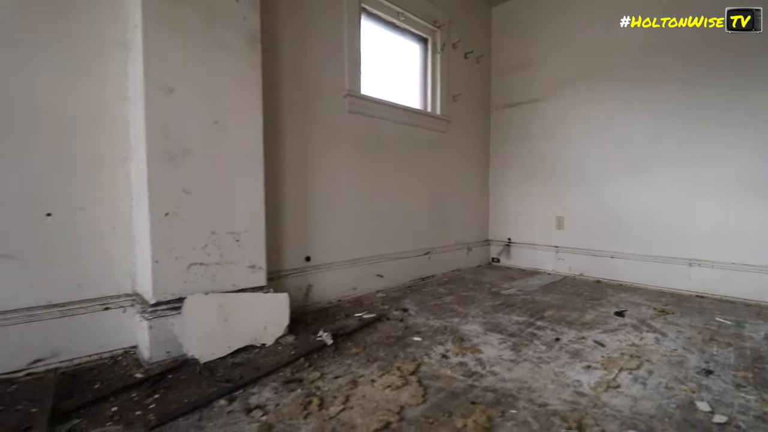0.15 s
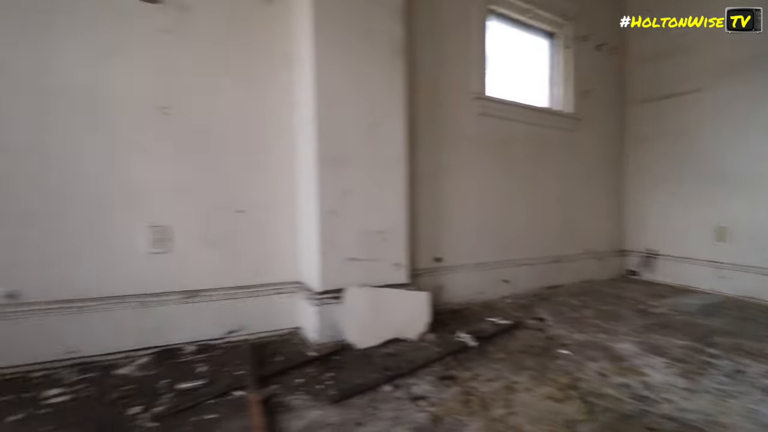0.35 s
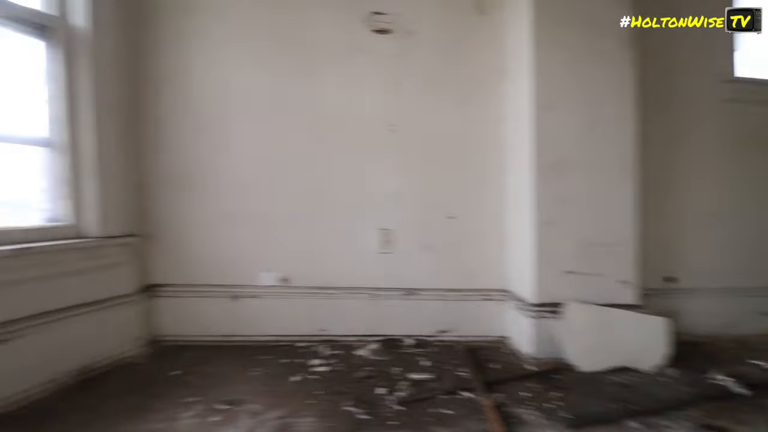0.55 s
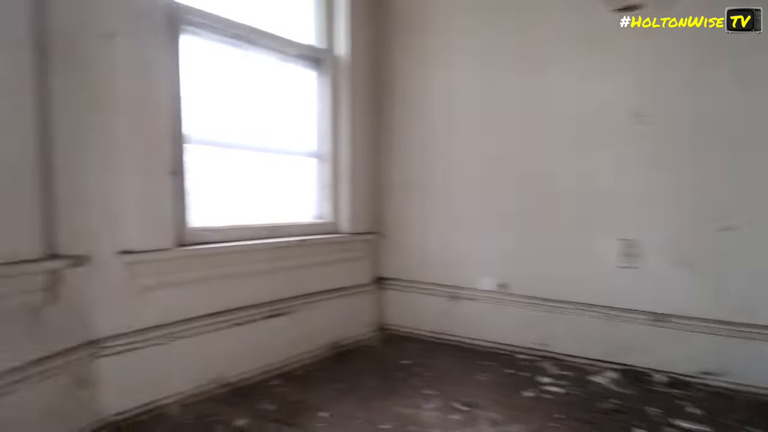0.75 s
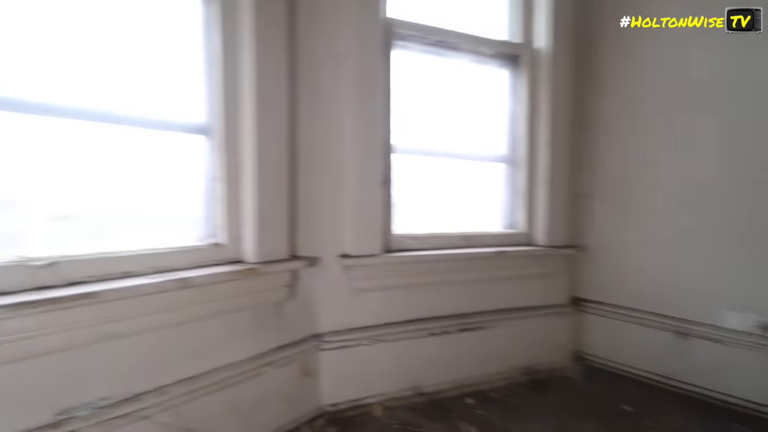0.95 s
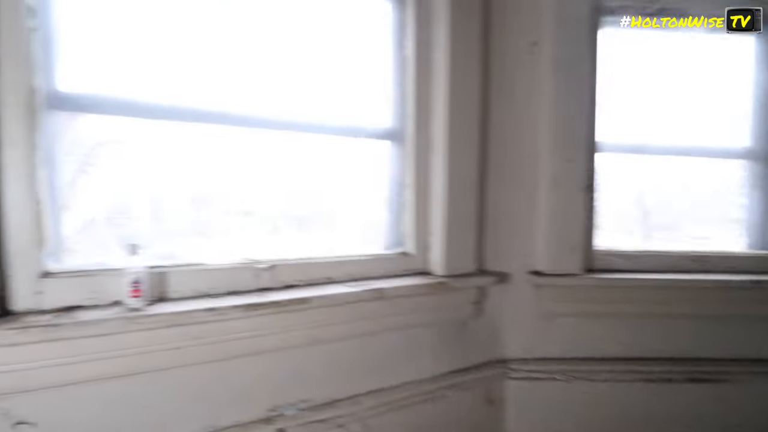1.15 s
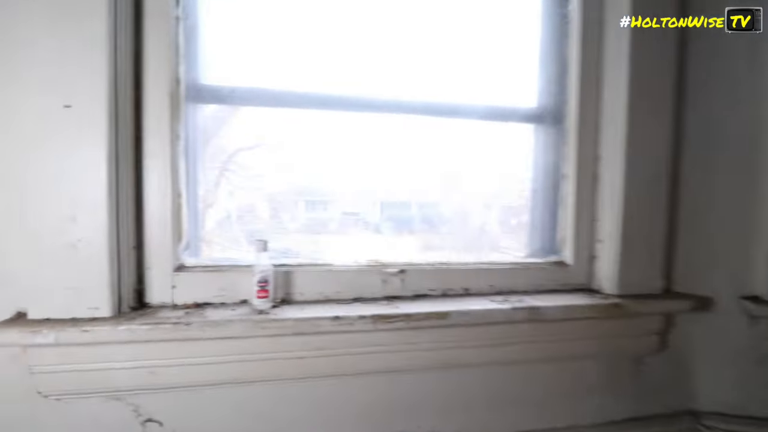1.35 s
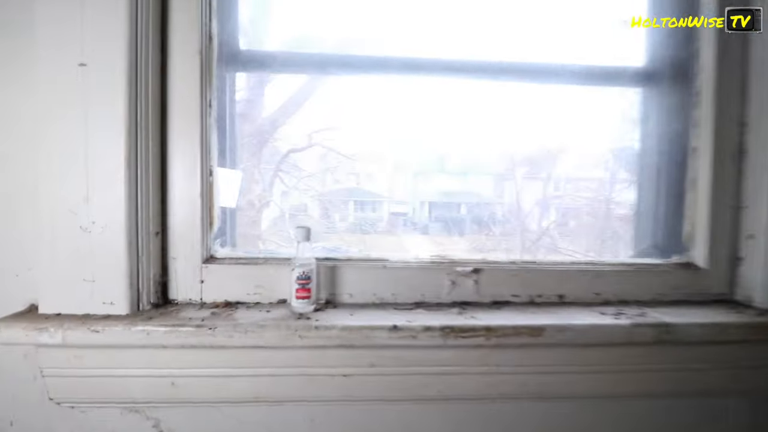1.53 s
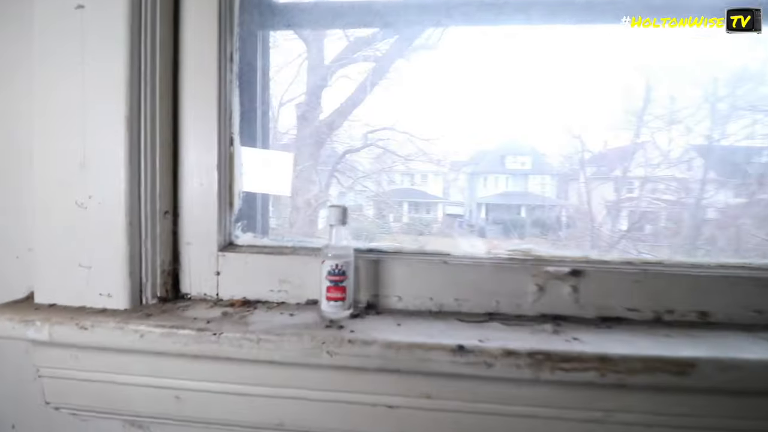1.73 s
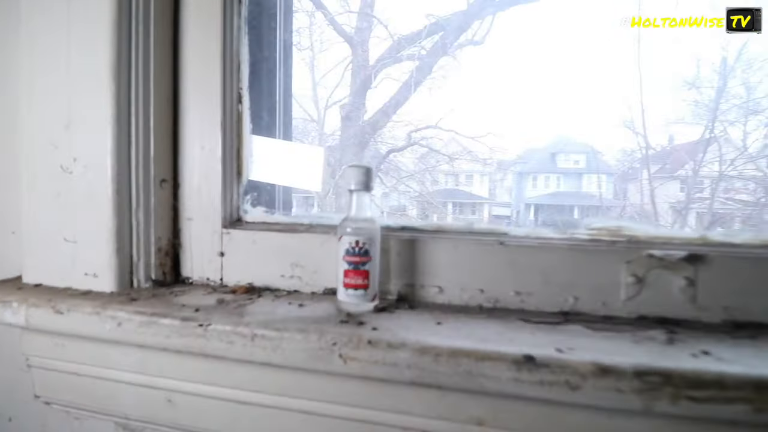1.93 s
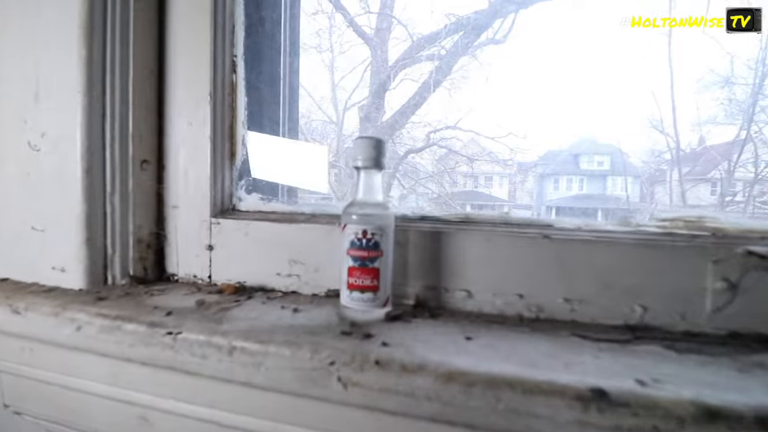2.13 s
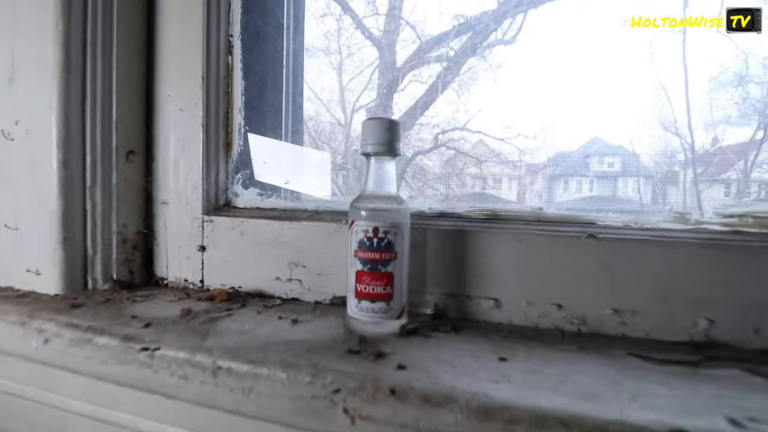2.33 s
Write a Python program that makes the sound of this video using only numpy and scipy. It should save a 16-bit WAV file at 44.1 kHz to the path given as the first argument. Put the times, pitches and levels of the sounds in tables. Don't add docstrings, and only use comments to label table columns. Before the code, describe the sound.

Three heavy, gritty footsteps on bare wooden boards echo through an empty, gutted house

```python
import sys
import numpy as np
from scipy import signal
from scipy.fft import rfft, irfft
from scipy.io import wavfile

SR = 44100
rng = np.random.default_rng(int(sys.argv[2]) if len(sys.argv) > 2 else 0)


def invert_db(level):
    return 10 ** (np.asarray(level, dtype=float) / 20)


def transcribe(u):
    v = np.clip(np.atleast_2d(u).T, -1, 1)
    q = np.round(v * 32767).astype(np.int16)
    wavfile.write(sys.argv[1], SR, q)


N = 109632
T = np.arange(N) / SR

# frequency in Hz, density in dB per Hz.
HUSH_SPECTRUM = [(15, -15.5), (25, -9), (128, -11.5), (167, -11.5), (326, -10), (488, -22), (709, -22),
                 (8550, -29.5), (15000, -33)]
# time in seconds, level in dB.
HUSH_FADE = [(0, 3), (.7, 0), (1.4, 0.5), (2.1, 0), (2.49, -6.5)]
HUSH_DB = -50.5

# start in seconds, rise in seconds, hold in seconds, level in dB, grain pitch in Hz.
SCUFFS = [(0.001, 0.0067, 0.064, -46.5, 650), (0.023, 0.015, 0.14, -48, 6900),
          (0.065, 0.022, .11, -44, 1150), (0.065, 0.013, 0.14, -46, 280), (0.231, 0.0075, 0.032, -39, 1900),
          (0.247, 0.028, 0.052, -45.5, 296), (0.969, 0.04, 0.16, -51, 483), (0.046, 0.03, 0.084, -46, 3240),
          (0.561, 0.019, 0.23, -55.5, 786), (.814, 0.009, 0.05, -44, 9400),
          (0.81, 0.0065, 0.01, -39.5, 3960), (0.818, 0.0067, 0.1, -42, 845),
          (0.993, 0.017, 0.046, -43.5, 10500), (0.998, 0.018, 0.041, -50, 3060),
          (1.571, 0.0062, .03, -45, 8900), (1.567, 0.0021, 0.01, -42, 2200),
          (1.575, 0.002, 0.063, -40.5, 650), (1.673, 0.016, 0.062, -50.5, 7400),
          (1.7, 0.023, 0.14, -46.5, 720), (1.886, 0.027, 0.075, -46, 7600),
          (1.898, 0.034, 0.036, -41.5, 3530), (1.914, 0.033, 0.039, -34.5, 820),
          (2.04, 0.009, 0.0099, -54, 8500), (2.039, 0.0067, 0.034, -43.5, 1490)]
SCUFF_RELEASE_S, GRAIN_OCTAVES = 0.033, 0.64
GRAINS_PER_S, GRAIN_SCATTER_DB = 6000, 1.8

# frequency in Hz, time to fall 60 dB in seconds.
ROOM_T60 = [(60, 0.46), (250, 0.92), (1000, 1), (3000, 0.61), (8000, 0.25), (15000, 0.1)]
# frequency in Hz, gain in dB.
ROOM_COLOUR = [(40, -15), (160, -9.5), (300, -1), (600, 0.5), (8000, 1), (15000, -1.5)]
ROOM_DB, ROOM_BUILD_S = -6.5, 0.014

# frequency in Hz, level in dB, time to fall 60 dB in seconds.
MODES_A = [(99.8, -14.5, 0.55), (136.7, -23, .12), (169.7, 0.5, 0.15), (205, -3, 0.24), (256.8, -4.5, 0.27),
           (335.2, -5.5, 0.27), (385, -11, 0.16), (517, -6, 0.064), (720, -18, 0.083)]
MODES_B = [(66.4, -4, 0.31), (101, -25, 0.18), (146, -10, 0.14), (205, -10, 0.075), (279, 0, 0.056),
           (355, 1.5, 0.08), (466.5, -3, 0.11), (587, -2.5, 0.071), (671, -1.5, 0.13), (850, -16, 0.036),
           (1010, -1, 0.032), (1234, -9.5, 0.11), (1524, 6.5, 0.018), (1900, -2, .02)]
MODES_C = [(69.5, -29, 0.25), (98.54, 5, 0.82), (116, -4.5, 0.3), (232, -11, 0.2), (283.5, -6.5, 0.47),
           (484, -1.5, 0.054), (695, 1.5, 0.2), (750, 5, 0.036), (867, -1, 0.022), (1140, -38, 0.053),
           (1453, 11, 0.065), (1670, 8, 0.093), (1690, -12, 0.054), (2200, 10.5, 0.09)]
# start in seconds, level in dB, contact in milliseconds.
BLOWS_A = [
    (0.097, -42.5, 2.8),
    (0.641, -48.5, 1.8),
    (0.7919, -23.5, 3.56),
    (0.844, -29, 2.57),
    (.862, -36, 3),
    (1.019, -40.5, 2.1),
    (1.181, -45, 1.3),
]
BLOWS_B = [
    (1.536, -31.5, 1.15),
    (1.5386, -25, .8),
    (1.545, -28.5, 3.8),
    (1.563, -26.5, 4.2),
    (1.5747, -26.5, 0.65),
    (1.5839, -23.5, 1.73),
    (1.671, -35.5, 1.25),
    (1.819, -34.5, 2.1),
]
BLOWS_C = [
    (.255, -47.5, 0.13),
    (1.86, -40.5, 3.1),
    (1.926, -40, 3.1),
    (1.95, -33.5, 1.26),
    (1.957, -29.5, 1.37),
    (1.962, -23.5, 4.3),
    (1.99, -37.5, 0.63),
    (2.04, -43, 0.79),
]
SLAP_DB, SPOT_DB, BOARD_LOW_HZ = 2.5, 1.5, 67

# start in seconds, level in dB, length in seconds.
JOLTS = [
    (0.112, -49.5, 0.065),
    (0.184, -48.5, 0.18),
    (.525, -48, 0.044),
    (0.805, -43, 0.14),
    (1.066, -49, .08),
    (1.547, -43, 0.11),
    (1.8, -65, 0.12),
]
# lower edge in Hz, upper edge in Hz.
JOLT_BAND_HZ = [22, 44]

# start in seconds, peak in dB, pitch in Hz.
FLAKES = [(.2533, -36, 2500), (.8185, -33, 7000), (.824, -33, 5500), (.835, -33, 3600),
          (1.5733, -29, 10500), (1.5736, -28, 3500), (1.5742, -20, 1500), (1.5813, -22, 9000),
          (1.5815, -22, 12500), (1.5933, -28, 9000), (1.6012, -21, 11000), (2.066, -35, 9000)]
FLAKE_T60_S, FLAKE_HISS = 0.004, 0.9

# frequency in Hz, side relative to mid in dB.
WIDTH = [(25, -13), (90, -16.5), (250, -13), (500, -9.5), (1000, -4), (2000, 0.4), (15000, -1)]
# frequency in Hz, gain in dB.
LEAN = [(100, -37), (500, -13), (2000, -11), (4000, -5), (8000, -22), (12000, -9)]
BODY_SCATTER_S = 0.002
# frequency in Hz, gain in dB.
MIC = [(20, 4.5), (3500, 2.5), (4900, -4), (6500, 1.5), (13000, -2), (15000, -7), (16500, -25)]


def unit(x):
    return x / np.sqrt(np.mean(x ** 2))


def read(table, hz):
    table = np.array(table, float)
    return np.interp(np.log(np.maximum(hz, 1)), np.log(table[:, 0]), table[:, 1])


def colour(x, table):
    size = 8192
    gain = invert_db(read(table, np.fft.rfftfreq(size, 1 / SR)))
    cepstrum = irfft(np.log(gain))
    cepstrum[1:size // 2] *= 2
    cepstrum[size // 2 + 1:] = 0
    response = irfft(np.exp(rfft(cepstrum)))
    return signal.fftconvolve(x, response)[:len(x)]


def house_hush():
    fade = invert_db(HUSH_DB + np.interp(T, *np.array(HUSH_FADE).T))
    return fade * unit(colour(rng.standard_normal(N), HUSH_SPECTRUM))


def sole_scuffs():
    out, t = np.zeros(N + SR), T[:SR // 2]
    for start, rise, hold, db, hz in SCUFFS:
        struck = rng.random(len(t)) < GRAINS_PER_S / SR
        size = invert_db(GRAIN_SCATTER_DB * rng.exponential(size=len(t)))
        impulses = struck * rng.standard_normal(len(t)) * size
        edges = hz * 2 ** np.array([-GRAIN_OCTAVES, GRAIN_OCTAVES])
        grains = signal.lfilter(*signal.butter(1, edges, "band", fs=SR), impulses)
        release = np.exp(-np.maximum(t - rise - hold, 0) / SCUFF_RELEASE_S)
        shape = np.clip(t / rise, 0, 1) * release
        i = int(start * SR)
        out[i:i + len(t)] += invert_db(db) * shape * unit(grains)
    return out[:N]


def wall_echo():
    t, spectrum = T[:SR], rfft(rng.standard_normal(SR))
    hz, out = np.maximum(np.arange(len(spectrum)), 1), 0
    for centre in 20 * 2 ** np.arange(0, 10, 0.5):
        octaves = np.clip(np.log2(hz / centre), -0.5, 0.5)
        band = irfft(spectrum * np.cos(np.pi * octaves) ** 2)
        out = out + band * invert_db(-60 * t / read(ROOM_T60, centre))
    out = out * (1 - np.exp(-t / ROOM_BUILD_S))
    return out / np.sqrt(np.sum(out ** 2))


def board(modes, blows):
    out, t = np.zeros(N), T[:SR // 2]
    for start, db, contact_ms in blows:
        push = np.hanning(max(contact_ms * SR / 1000, 4) * 1.4) ** 2
        ring = np.zeros(len(t))
        for hz, mode_db, t60 in modes:
            spot_db = SPOT_DB * rng.standard_normal()
            ring += invert_db(mode_db + spot_db - 60 * t / t60) * np.sin(2 * np.pi * hz * t)
        hit = signal.fftconvolve(ring, -push / push.sum())
        slap = np.diff(push, 2, prepend=0, append=0)
        hit[:len(slap)] += invert_db(SLAP_DB) * slap / np.abs(slap).max()
        i = int(start * SR)
        out[i:i + len(hit)] += invert_db(db) * hit[:N - i]
    return signal.lfilter(*signal.butter(2, BOARD_LOW_HZ, "high", fs=SR), out)


def camera_jolts():
    band = signal.butter(2, JOLT_BAND_HZ, "band", fs=SR, output="sos")
    wobble = unit(signal.sosfilt(band, rng.standard_normal(N)))
    strength = np.zeros(N)
    for start, db, length in JOLTS:
        strength += invert_db(db) * np.sin(np.pi * np.clip((T - start) / length, 0, 1)) ** 0.5
    return wobble * strength


def cracking_flakes():
    out, t = np.zeros(N), T[:512]
    for start, db, hz in FLAKES:
        rough = 1 + FLAKE_HISS * rng.standard_normal(len(t))
        crack = np.sin(2 * np.pi * hz * t) * rough * (1 - np.exp(-t / 0.00016))
        i = int(start * SR)
        out[i:i + len(t)] += invert_db(db - 60 * t / FLAKE_T60_S) * crack
    return out


def body_scatter(feet):
    smear = rng.standard_normal(512) * np.exp(-T[:512] / BODY_SCATTER_S)
    return signal.fftconvolve(feet, unit(smear) / np.sqrt(512))[:N]


def scene():
    feet = sole_scuffs() + cracking_flakes()
    feet += board(MODES_A, BLOWS_A) + board(MODES_B, BLOWS_B) + board(MODES_C, BLOWS_C)
    walls = invert_db(ROOM_DB) * colour(feet, ROOM_COLOUR)
    diffuse_mid = signal.fftconvolve(walls, wall_echo())[:N] + house_hush()
    diffuse_side = signal.fftconvolve(walls, wall_echo())[:N] + house_hush()
    mid = feet + diffuse_mid + camera_jolts()
    side = colour(diffuse_side + body_scatter(feet), WIDTH) + 0.25 * camera_jolts()
    lean = colour(mid, LEAN)
    return np.array([mid + side - lean, mid - side + lean])


def top_cut(x):
    return signal.sosfilt(signal.butter(12, 15780, fs=SR, output="sos"), x)


def record(dry):
    heard = np.array([colour(channel, MIC) for channel in dry])
    return top_cut(heard)


dry = scene()
out = record(dry)
transcribe(out)
```